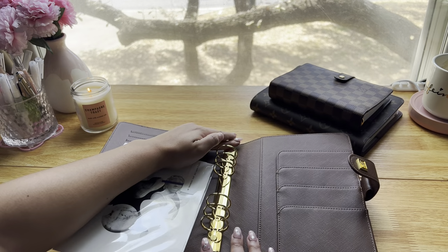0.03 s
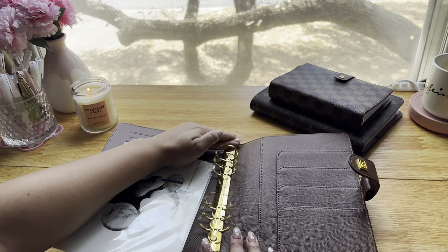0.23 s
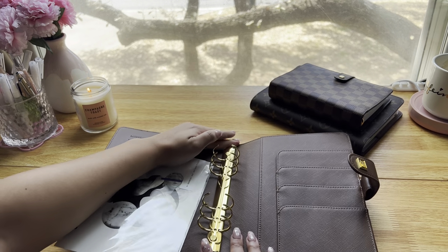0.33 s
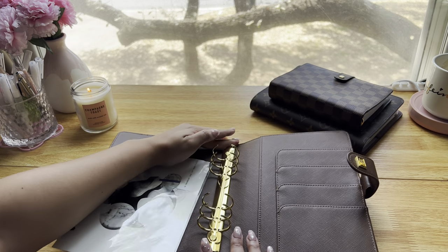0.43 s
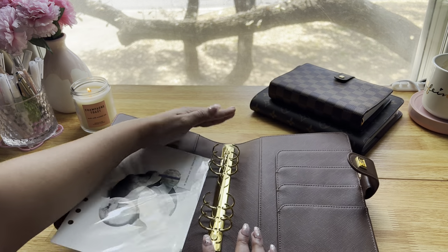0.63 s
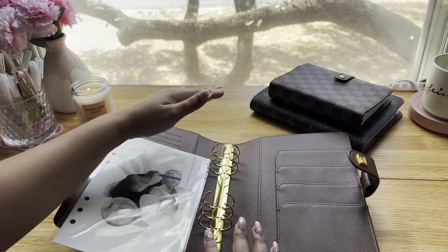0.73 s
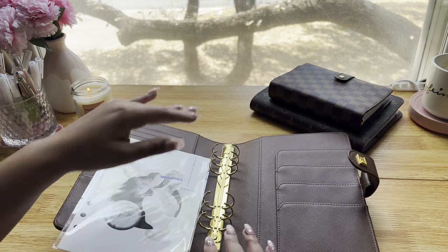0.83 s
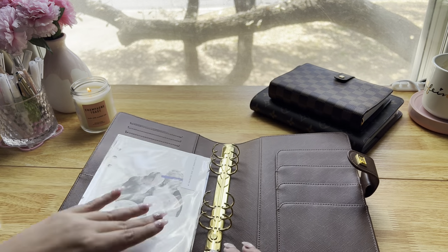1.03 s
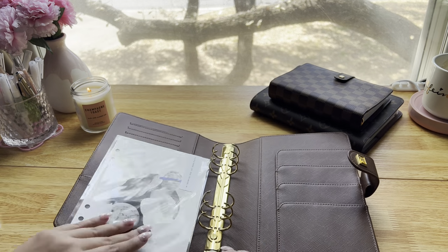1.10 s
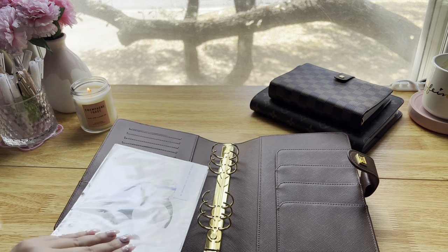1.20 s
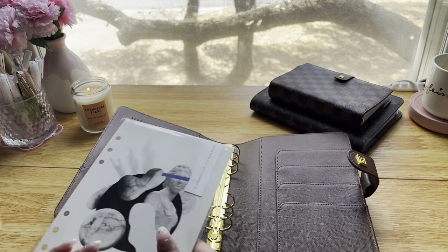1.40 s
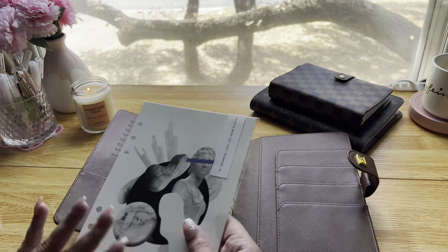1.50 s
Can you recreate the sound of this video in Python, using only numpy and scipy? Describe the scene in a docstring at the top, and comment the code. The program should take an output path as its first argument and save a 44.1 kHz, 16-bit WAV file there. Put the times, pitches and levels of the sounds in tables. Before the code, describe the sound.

Sharp metallic snap of a ring binder closing, followed by faint plastic rustling and ticks.

```python
"""A sharp metal snap, just after a faint touch: a leather binder's rings shut on a wooden desk.
The steel cracks and rings, the spine plate barks, the cover knocks, and a small room answers.
Then a hand slides a plastic sleeve off the binder and picks it up: grainy friction, a flick of
the stiff sheet, faint ticks and bumps. A low rumble and a faint hum lie underneath."""
import sys
import numpy as np
from scipy import signal
from scipy.fft import irfft
from scipy.io import wavfile
from scipy.ndimage import uniform_filter1d

SR = 44100
rng = np.random.default_rng(int(sys.argv[2]) if len(sys.argv) > 2 else 0)


def transcribe(signal):
    """Save signal, clipped to [-1, 1], as a 16-bit WAV file at the path in sys.argv[1]."""
    frames = np.atleast_2d(signal).T
    limited = np.clip(frames, -1, 1)
    pcm = np.round(limited * 32767).astype(np.int16)
    wavfile.write(sys.argv[1], SR, pcm)


N = 68355
T = np.arange(N) / SR
HZ = np.fft.rfftfreq(N, 1 / SR)
SNAP_S, ROOM_RISE_S = .2472, .006


# ring halves meeting: start_s, level_db
RING_CLASHES = [(0.2477, -9.5), (0.2480, -7.5), (0.25, -21), (.2590, -24)]
# tone of the crack: freq_hz, relative_db
CRACK_TONE = [(300, -21.5), (800, -0.5), (1500, -12), (2800, -2.5), (4500, -2), (6500, -8), (8600, 6),
              (10500, -12.5), (13000, -2), (16000, -23.5)]
# broad peaks and notches of the mechanism: centre_hz, width_hz, lift_db
MECHANISM_PEAKS = [(2460, 100, 5.5), (3330, 200, 1.5), (4220, 65, -7.5), (5150, 390, 4.5), (6800, 110, -2),
                   (7930, 140, -6), (9000, 720, 4)]
# ringing steel: pitch_hz, level_db, t60_s
STEEL_MODES = [(1367, -28.5, .33), (1520, -33, .28), (1782, -32.5, .22), (2034, -35, .18), (2363, -34, .25),
               (2530, -23, .08), (2659, -31, .15), (3112, -30, .18), (3304, -30, .13), (4613, -36, .3),
               (5225, -26, .07), (5329, -36, .27), (6062, -41, .26), (6690, -39, .2), (6995, -41, .28),
               (8227, -30, .21), (8650, -29, .1), (9002, -30, .24), (9238, -35, .2), (12730, -39, .11)]
def steel_rings(uneven_db):
    """The ring halves collide in a cluster of bright cracks, and the steel rings on."""
    out = np.zeros((2, N))
    lift_db = sum(db * resonance(hz, width) for hz, width, db in MECHANISM_PEAKS)
    tone_db = curve(CRACK_TONE, HZ) + lift_db + uneven_db
    for start_s, db in RING_CLASHES:
        add(out, start_s, amp(db) * struck(rise_s=.001, t60_s=.019) * noise(tone_db, NEAR_COHERENCE))
    add(out, SNAP_S, shimmer(STEEL_MODES, rise_s=.001))
    return out


# bark of the spine plate: pitch_hz, level_db, t60_s
PLATE_MODES = [(874, -6.5, 0.047), (513.5, -19, .09), (555, -34.5, .45), (595, -23, .11), (649, -17.5, .08),
               (737, -24, 0.4), (815, -24, .24), (842, -29, 0.2), (911, -26.5, 0.25), (1079, -26.5, 0.24),
               (1166.3, -33.5, 0.44), (433, -25.5, .7)]
def spine_plate():
    """The hardest clash of the rings sets the plate barking in the midrange."""
    out = np.zeros((2, N))
    add(out, RING_CLASHES[1][0], pan(1.5) * ring(PLATE_MODES, rise_s=.00081))
    return out


# cover hitting the desk: start_s, gain_db
COVER_HITS = [(.2490, -2.5), (0.2668, 2.5), (0.281, -8.5), (.3040, -20)]
# body of cover and desk: pitch_hz, level_db, t60_s
DESK_MODES = [(191, -26.5, 0.2), (241.6, -15.5, .13), (273.5, -37.5, 0.53), (291.8, -20, .14),
              (415, -17.5, 0.13), (449, -14, 0.13), (497, -20, 0.093), (531.4, -48, 1.35)]
def cover_knocks():
    """The cover bounces on the desk, each knock sounding the same low, woody modes."""
    out = np.zeros((2, N))
    knock = pan(5) * ring(DESK_MODES, rise_s=.0058)
    for start_s, db in COVER_HITS:
        add(out, start_s, amp(db) * knock)
    return out


# tone of the rattle: freq_hz, relative_db
RATTLE_TONE = [(60, -16.5), (140, -16), (250, 1.5), (500, 9.5), (850, 17), (1400, -12.5), (3000, -5.5),
               (6000, -12), (8500, -16), (11000, -9), (15500, -14)]
def rattle(uneven_db):
    """The shaken mechanism and nearby reflections blur into one short burst."""
    out = np.zeros((2, N))
    wash = noise(curve(RATTLE_TONE, HZ) + uneven_db, FAR_COHERENCE)
    add(out, SNAP_S, amp(-11) * struck(rise_s=.0041, t60_s=.2) * wash)
    return out


# tone of the snap's tail: freq_hz, relative_db
ECHO_TONE = [(60, -20.5), (130, -8), (250, 2.5), (500, 1.5), (850, 0.5), (1300, -3), (2600, -7),
             (5000, -10.5), (8500, -9.5), (10500, -20), (15500, -22.5)]
# length of that tail: freq_hz, t60_s
ECHO_DECAY = [(100, 0.61), (400, 0.49), (1000, 0.41), (3000, 0.37), (8000, 0.36), (14000, 0.26)]
def snap_echo(uneven_db):
    """The snap dies away in the room, treble first."""
    wash = noise(curve(ECHO_TONE, HZ) + uneven_db, FAR_COHERENCE)
    hz, t, bands = signal.stft(wash, SR, nperseg=512)
    fall = amp(-60 * t / curve(ECHO_DECAY, hz)[:, None])
    tail = signal.istft(bands * fall, SR, nperseg=512)[1][:, :N]
    out = np.zeros((2, N))
    add(out, SNAP_S, amp(-16.5) * np.minimum(T / ROOM_RISE_S, 1) * tail)
    return out


# nails and plastic ticking: start_s, level_db, centre_hz, width_octaves, t60_s, pan_db
NAIL_TICKS = [(.108, -51, 448, 1, .07, 3), (.109, -61.5, 3287, .6, .015, 1),
              (.543, -42.5, 1910, 0.71, 0.023, 0.5), (.582, -51.5, 2600, 0.68, .03, -2),
              (.693, -40.5, 678, 0.43, 0.058, 0.5), (.742, -49, 1791, 0.56, 0.046, -0.5),
              (.797, -47.5, 1881, 0.64, 0.06, 3.5), (.969, -55.5, 1790, 0.14, 0.034, 4),
              (1.0815, -41.5, 6044, 1.2, .012, 5), (1.163, -44, 3490, 0.65, .025, 6.5),
              (1.178, -55, 5030, 0.41, 0.015, 4), (1.218, -43.5, 6300, 0.65, 0.011, 3),
              (1.261, -41.5, 3530, 1.14, 0.0089, 2), (1.287, -45.5, 2640, 0.73, 0.017, 7),
              (1.311, -54, 2600, 1.1, 0.018, 2.5), (1.3515, -44, 9000, 0.32, 0.027, 4),
              (1.3535, -36, 9200, 0.26, 0.027, 16), (1.357, -21.5, 8625, 0.42, 0.0078, 1.5),
              (1.3565, -31, 2130, 0.19, 0.02, 5.5), (1.3570, -39.5, 1450, 0.14, 0.015, 8),
              (1.362, -35, 7360, 1.4, 0.035, 2), (1.414, -37, 1760, 0.17, 0.0075, 10.5),
              (1.4285, -39.5, 9000, 0.99, 0.012, 0.5), (1.437, -44, 635, 0.56, 0.03, 9),
              (1.4915, -37, 4170, 0.97, 0.013, 8.5)]
# hand and cover bumping the desk: start_s, level_db, centre_hz, width_octaves, t60_s, pan_db
SOFT_BUMPS = [(.108, -43, 83, 0.69, .35, -0.5), (.255, -46, 55.2, .6, .2, -1.5),
              (.52, -50.5, 126, 0.35, 0.7, -4), (.695, -40, 259, 0.31, 0.12, 6),
              (.79, -44.5, 80.5, 0.77, 0.27, 1), (.89, -48, 111, 0.18, 0.13, 1),
              (1.125, -53.5, 133.3, 0.31, 0.23, -1), (1.441, -42, 83.5, 1, 0.36, 3.5),
              (1.455, -37.5, 128, 0.44, 0.062, 2.5), (1.461, -34, 344, 0.59, 0.039, 7),
              (1.4635, -34.5, 397, 0.6, 0.022, 4.5), (1.492, -34.5, 445, 1, 0.017, 7),
              (1.497, -46, 66, 0.58, 0.16, -1.5)]
# tone shared by ticks and bumps: freq_hz, relative_db
TOUCH_TONE = [(100, 5), (9000, -2), (11000, -3), (16000, -12)]
def touches(rows, rise_s):
    """Each touch is a short, heavily damped burst around one broad resonance."""
    out = np.zeros((2, N))
    t = T[:8192]
    for start_s, db, hz, octaves, t60_s, pan_db in rows:
        peak = np.exp(-.5 * (np.log2((HZ + 1) / hz) / octaves) ** 2)
        skirt = amp(-38.5) / (1 + (HZ / hz) ** 2)
        burst = noise(20 * np.log10(peak + skirt) + curve(TOUCH_TONE, HZ), NEAR_COHERENCE, len(t))
        envelope = struck(rise_s, t60_s, t) * (1 - t / t[-1])  # the fade shortens long decays
        strength = amp(db) * np.sqrt(np.mean(envelope ** 2))
        sides = pan(pan_db - curve(MIC_BALANCE, hz))
        add(out, start_s, strength * sides * unit_rms(envelope * burst))
    return out


# swell of the flick: time_s, level_db
FLICK_LEVELS = [(1.079, -92.5), (1.083, -39), (1.104, -47), (1.122, -49), (1.16, -63), (1.3, -88)]
# tone of its rasp: freq_hz, relative_db
FLICK_TONE = [(200, -6), (600, -7), (1100, 1), (4200, -1.5), (6500, -3.5), (9000, -2.5), (10500, -22.5),
              (15500, -19)]
# ringing sheet: pitch_hz, level_db, t60_s
SHEET_MODES = [(1040, -52, .14), (1400, -50, .14), (1880, -43, .15), (2019, -47, .2), (2821, -45.5, .13),
               (2950, -48, .13), (3370, -44, .15), (4167, -48, .12), (4651, -50, .1), (6196, -52, .14),
               (8635, -55, .13)]
def sleeve_flick():
    """Fingers catch the stiff sleeve: a short rasp, and the sheet rings."""
    out = friction(FLICK_LEVELS, curve(FLICK_TONE, HZ) + ripple())
    add(out, 1.083, shimmer(SHEET_MODES, rise_s=.003))
    return out


# stroke of the slide: time_s, level_db
SLIDE_LEVELS = [(1.10, -95), (1.16, -59), (1.21, -57), (1.245, -64), (1.305, -63.5), (1.34, -76.5),
                (1.365, -54), (1.40, -60), (1.46, -61), (1.55, -59.5)]
# tone of sliding plastic: freq_hz, relative_db
SLIDE_TONE = [(200, -7), (600, -6.5), (1200, 1.5), (1700, -1), (2600, -3.5), (4200, -2.5), (6500, -8.5),
              (9000, -3.5), (10500, -21), (15500, -21)]
def sleeve_slide():
    """The plastic sleeve hisses as it slides under the hand."""
    return friction(SLIDE_LEVELS, curve(SLIDE_TONE, HZ) + ripple())


# swell of the scrape: time_s, level_db
SCRAPE_LEVELS = [(1.07, -100), (1.13, -80), (1.33, -81), (1.39, -67), (1.46, -62), (1.495, -58),
                 (1.53, -56)]
# voice of the edge: centre_hz, width_hz, relative_db
EDGE_PEAKS = [(2060, 190, 0), (3360, 120, -11), (4650, 130, -6), (7790, 250, -12)]
def edge_scrape():
    """The lifted sleeve's edge drags over the binder and sings in a few narrow resonances."""
    peaks = sum(amp(db) * resonance(hz, width) for hz, width, db in EDGE_PEAKS)
    return friction(SCRAPE_LEVELS, 20 * np.log10(peaks))


# stroke of the arm: time_s, level_db
BRUSH_LEVELS = [(0, -102), (.09, -68), (.125, -71), (.2, -72.5), (.5, -65), (.68, -55.5), (.72, -51.5),
                (.82, -59), (.88, -70), (1.0, -64), (1.55, -74.5)]
# tone of skin on the page: freq_hz, relative_db
SKIN_TONE = [(100, -3), (400, 5.5), (900, -11), (2000, -9.5), (4000, -19.5), (8000, -25.5), (10500, -40.5),
             (15000, -45)]
def arm_brush():
    """The arm brushes over the page with a soft, dull rub."""
    return friction(BRUSH_LEVELS, curve(SKIN_TONE, HZ))


# faint tones before the snap: pitch_hz, level_db, t60_s
FAINT_TONES = [(506, -64, 1.5), (1100, -65.5, 2.5), (1230, -66.5, 1.8)]
def faint_tones():
    """Three faint tones sound between the first touch and the snap."""
    out = np.zeros((2, N))
    add(out, .13, ring(FAINT_TONES, rise_s=.002))
    return out * (T < SNAP_S)


# tone of the reverb: freq_hz, relative_db
REVERB_TONE = [(200, 0.5), (9000, -2.5), (11000, -6.5), (16000, -9)]
def reverb(sound):
    """The room leaves a short diffuse tail behind the small sounds."""
    tail = noise(curve(REVERB_TONE, HZ), FAR_COHERENCE) * struck(ROOM_RISE_S, t60_s=.57)
    return signal.fftconvolve(sound, tail / np.linalg.norm(tail[0]), axes=1)[:, :N]


# steady hum: pitch_hz, level_db
HUM_TONES = [(109, -64), (392, -74), (441, -79.5), (549, -82.5)]
# noise bed: freq_hz, relative_db
RUMBLE_TONE = [(20, -19.5), (35, -10.5), (52, 1.5), (80, -6.5), (110, 2.5), (170, -12.5), (300, -22),
               (500, -19.5), (800, -32), (1500, -36), (2100, -29.5), (2800, -45.5), (8000, -46),
               (16000, -59.5)]
def room_tone():
    """Faint steady tones over a low rumble."""
    hum = sum(amp(db) * np.sin(2 * np.pi * (hz * T + rng.random())) for hz, db in HUM_TONES)
    return hum + amp(-57) * noise(curve(RUMBLE_TONE, HZ), FAR_COHERENCE)


# how alike left and right are for close sounds: freq_hz, coherence
NEAR_COHERENCE = [(100, 1), (800, 0.47), (2000, 1), (5000, 0.46), (10000, 0.62)]
# the same for diffuse sounds: freq_hz, coherence
FAR_COHERENCE = [(100, .93), (300, 0.57), (800, 0.28), (2000, 0.22), (5000, .1), (12000, 0.23)]
# lean of the stereo image: freq_hz, left_over_right_db
MIC_BALANCE = [(60, 1.5), (300, 1), (1000, 2), (2500, 1.5), (5000, 6.5), (9000, 0.5), (15000, -1.5)]
# phase between the sides: freq_hz, left_lead_rad
MIC_LEAD = [(100, .1), (250, .6), (800, 0.4), (2000, 0.64), (5000, 1.8), (10000, 0.17)]
def noise(tone_db, coherence, size=N):
    """Unit-rms stereo noise of a given tone, as the microphone pair hears it."""
    hz = np.fft.rfftfreq(size, 1 / SR)
    common, separate = np.exp(2j * np.pi * rng.random((2, len(hz))))
    alike = np.clip(curve(coherence, hz), -1, 1)
    lean = amp(curve(MIC_BALANCE, hz) / 2)
    lag = np.exp(-1j * curve(MIC_LEAD, hz))
    right = (alike * common + np.sqrt(1 - alike ** 2) * separate) * lag
    spectrum = np.array([common * lean, right / lean]) * amp(np.interp(hz, HZ, tone_db))
    return unit_rms(irfft(spectrum, size))


def friction(levels, tone_db, slips_per_s=7500, spread_db=3, grain_share=.34):
    """A hiss broken up by tiny slips, following the stroke."""
    slips = rng.random(N) < slips_per_s / SR
    strengths = amp(spread_db * np.minimum(rng.exponential(1, N), 5))
    grain = unit_rms(uniform_filter1d(slips * strengths, size=24))
    stroke = amp(np.interp(T, *np.transpose(levels)))
    return stroke * unit_rms(noise(tone_db, FAR_COHERENCE) * (1 - grain_share + grain_share * grain))


def ring(modes, rise_s):
    """Decaying sines that start together."""
    return sum(amp(db) * struck(rise_s, t60) * np.sin(2 * np.pi * hz * T) for hz, db, t60 in modes)


def shimmer(modes, rise_s):
    """Decaying high modes, which reach each microphone with a phase of their own."""
    return sum(amp(db) * struck(rise_s, t60) * np.sin(2 * np.pi * (hz * T + .5 * rng.random((2, 1))))
               for hz, db, t60 in modes)


def ripple(depth_db=3.5, spacing_hz=120):
    """Random hills and dips, in decibels, of a body with many close resonances."""
    knots = np.clip(rng.standard_normal(2000), -2, 2)
    return depth_db * np.interp(HZ / spacing_hz, np.arange(len(knots)), knots)


def resonance(centre_hz, width_hz):
    """A spectral peak of height one."""
    return 1 / (1 + (2 * (HZ - centre_hz) / width_hz) ** 2)


def struck(rise_s, t60_s, t=T):
    """Envelope: quick rise, exponential fall."""
    return np.minimum(t / rise_s, 1) * amp(-60 * t / t60_s)


def amp(db):
    """Decibels to gain."""
    return 10 ** (np.asarray(db) / 20)


def unit_rms(x):
    """Scales to unit rms."""
    return x / np.sqrt(np.mean(x ** 2) + 1e-20)


def curve(points, hz):
    """Reads a table on a log-frequency axis."""
    freqs, values = np.transpose(points)
    return np.interp(np.log(hz + 1), np.log(freqs), values)


def pan(db):
    """Left and right gains; positive leans left."""
    return amp(np.array([[db], [-db]]) / 2)


def add(mix, start_s, sound):
    """Mixes a sound in at a time."""
    part = mix[:, max(round(start_s * SR), 0):][:, :sound.shape[-1]]
    part += sound[..., :part.shape[1]]


def scene():
    """The snap, the handling and the quiet room."""
    taps = touches(NAIL_TICKS, rise_s=.0005) + touches(SOFT_BUMPS, rise_s=.002)
    rubs = sleeve_slide() + sleeve_flick() + edge_scrape() + arm_brush()
    # the snap's noises share one ripple, which flattens out below the lowest steel mode
    uneven_db = ripple() * np.minimum(HZ / STEEL_MODES[0][0], 1) ** 2
    snap = steel_rings(uneven_db) + spine_plate() + cover_knocks() + rattle(uneven_db)
    return snap + snap_echo(uneven_db) + taps + rubs + faint_tones() + amp(-13) * reverb(taps) + room_tone()


def record(dry, low_cut_hz=40, high_cut_hz=16250):
    """Microphone low cut; peaks round off at full scale; then the band limit."""
    dry = signal.sosfilt(signal.butter(2, low_cut_hz, "high", fs=SR, output="sos"), dry)
    rounded = dry / (1 + dry ** 8) ** (1 / 8)
    lowpass = signal.firwin(511, high_cut_hz, window=("kaiser", 9), fs=SR)
    return signal.oaconvolve(rounded, lowpass[None], "same")


dry = scene()
out = record(dry)
transcribe(out)
```